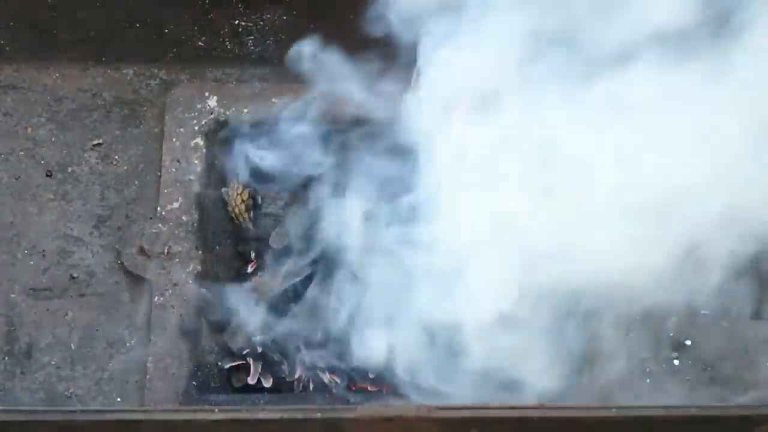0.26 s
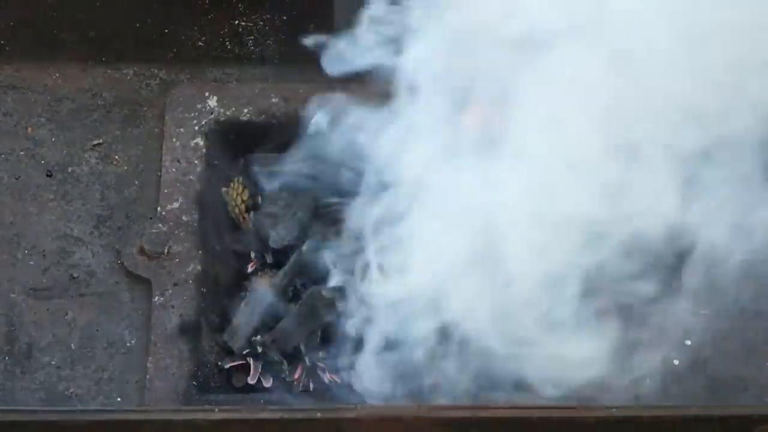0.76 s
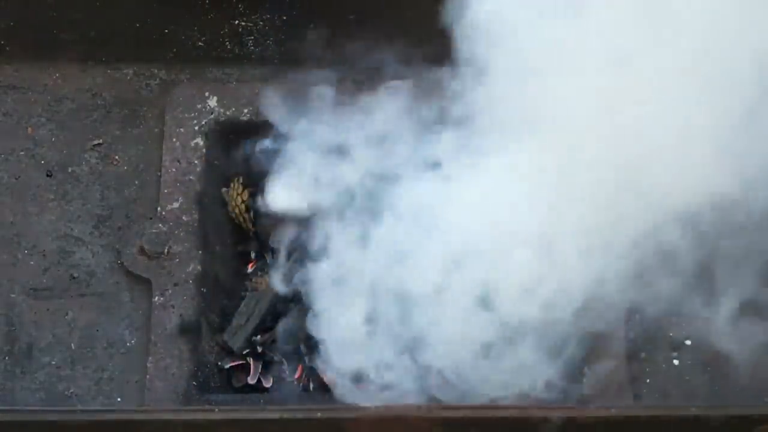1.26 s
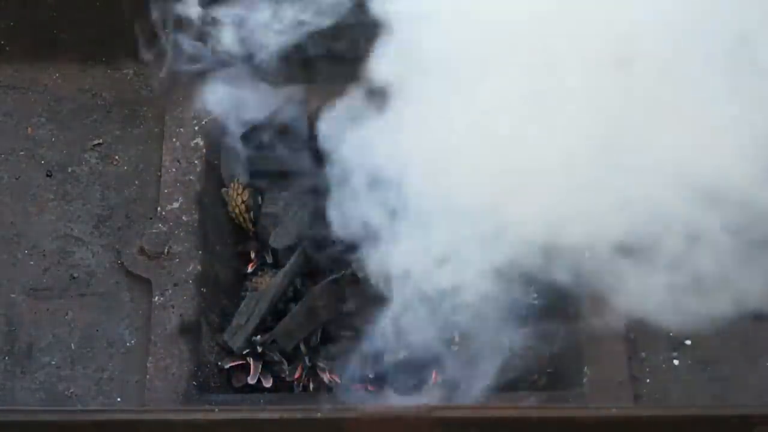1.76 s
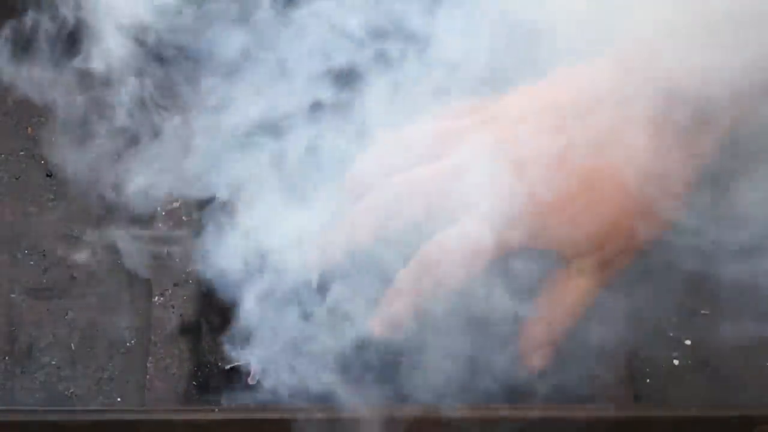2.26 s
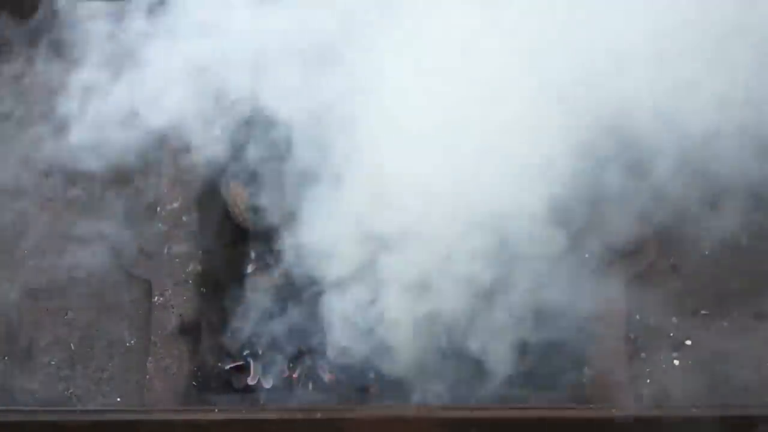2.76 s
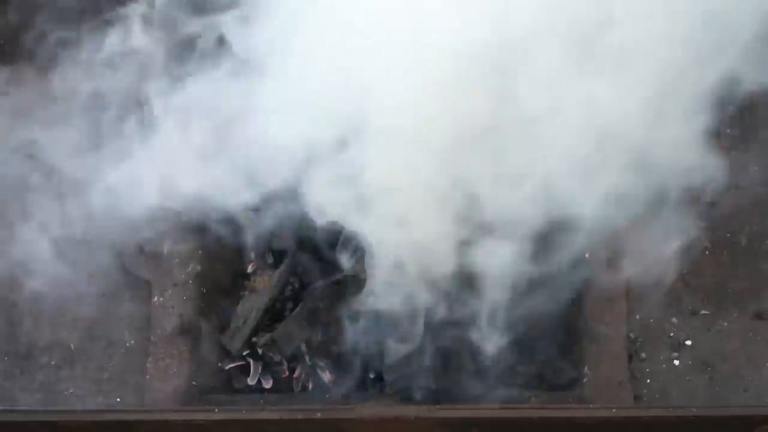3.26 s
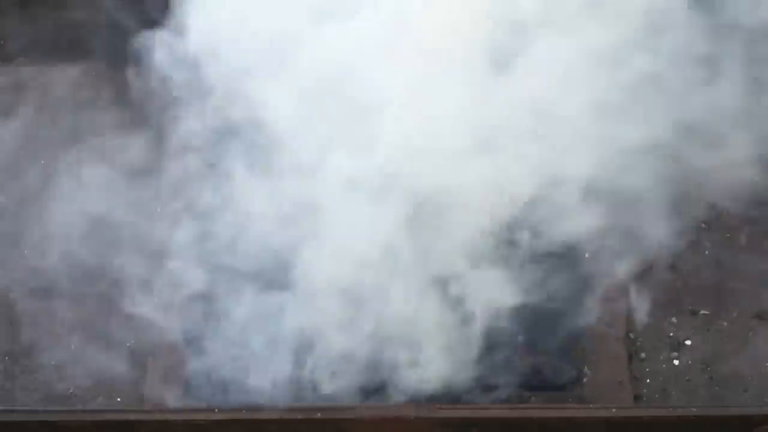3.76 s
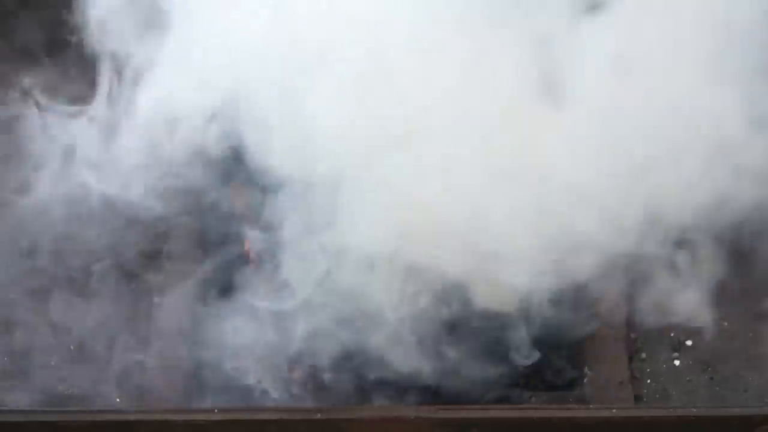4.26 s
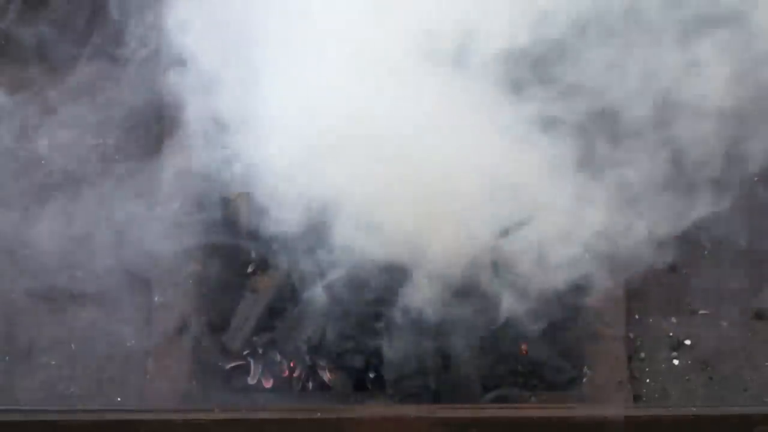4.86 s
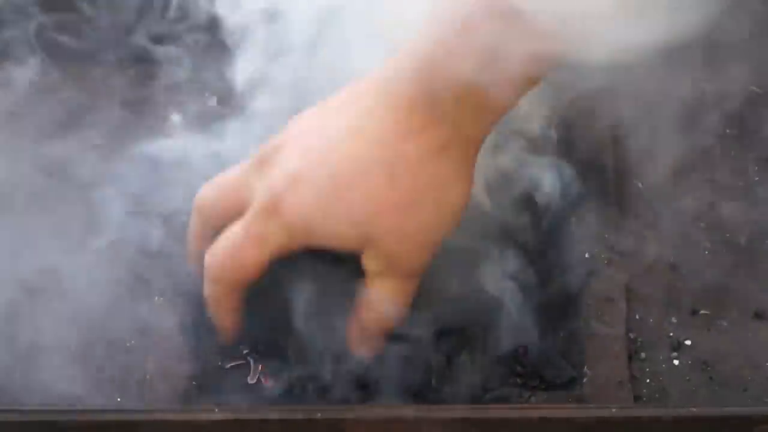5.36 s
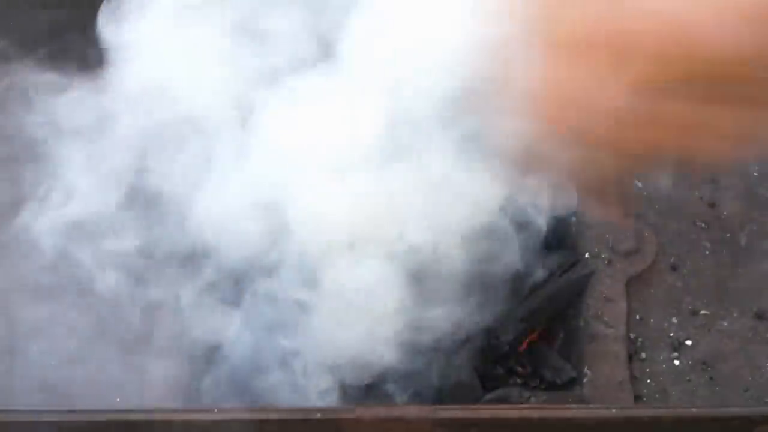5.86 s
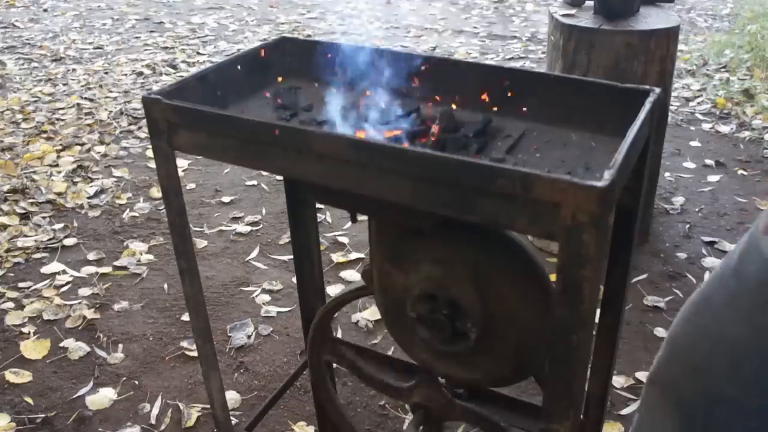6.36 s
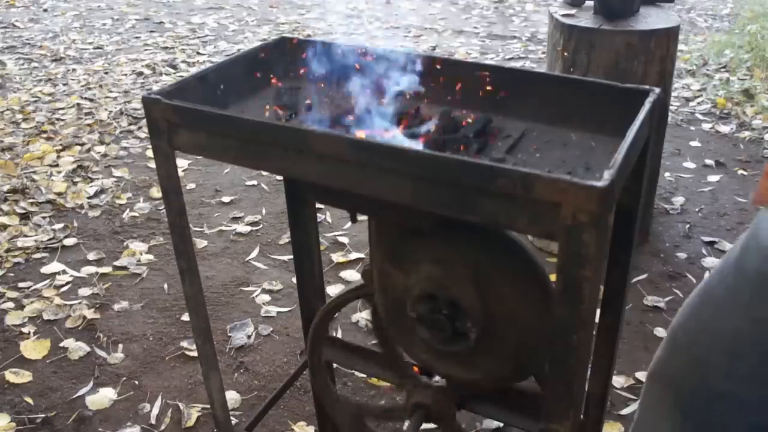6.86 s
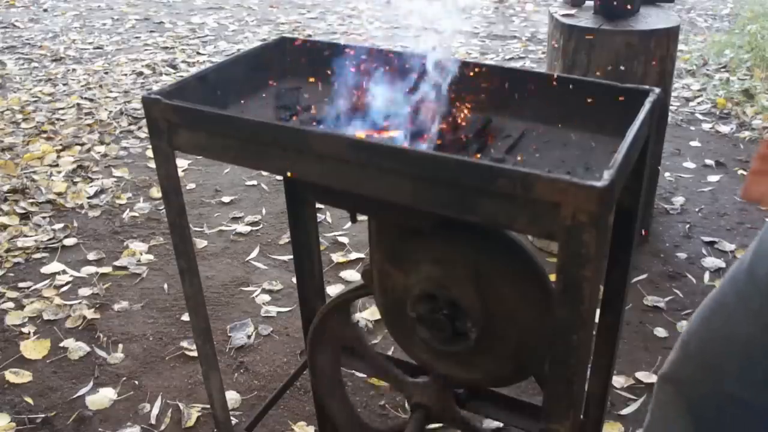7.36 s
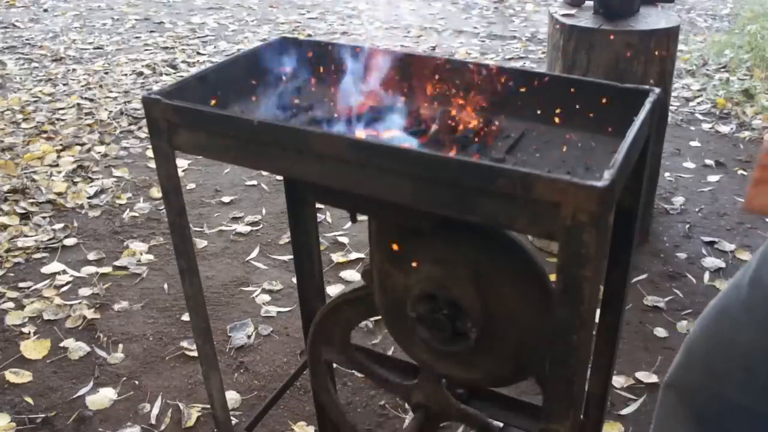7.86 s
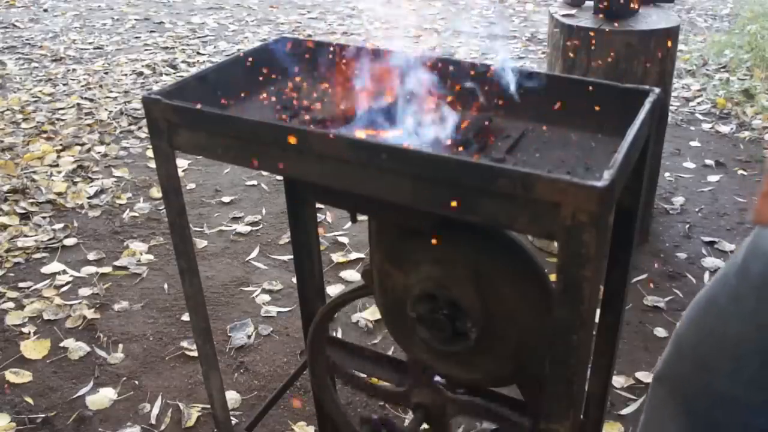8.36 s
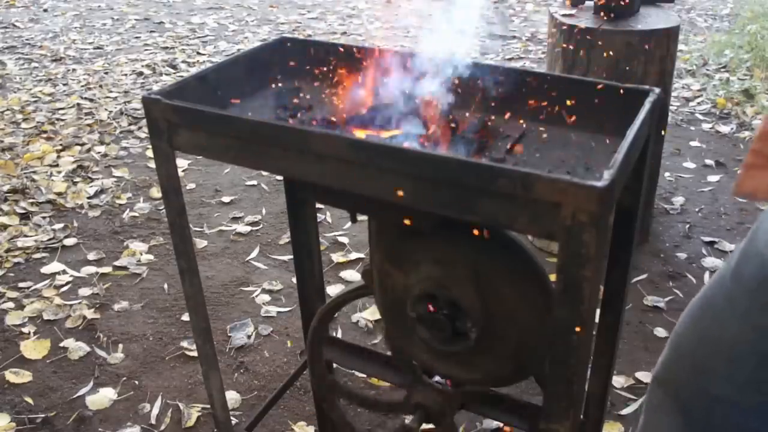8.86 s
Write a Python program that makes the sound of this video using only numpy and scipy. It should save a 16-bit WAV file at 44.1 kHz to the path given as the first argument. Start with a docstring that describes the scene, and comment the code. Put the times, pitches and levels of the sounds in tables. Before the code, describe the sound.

Dry scraping and clunking of coal, two small tinkling drops on iron, then an abrupt switch to rushing fan air, belt clacks and fierce crackling fire.

```python
"""Outdoor forge. First, coal is raked in a box to the right: grain noise for drag and slides, bursts for knocks.
Twice lumps drop on the hearth: cracks, tinkles, ringing pan and grate. Yard air and a passing low hum lie behind.
Abruptly at 6.07 s the forge is heard from a step back with its hand-cranked blower on: coloured noise roars
through casing resonances, the belt drive clacks now and then with ringing iron modes, and over a deep flame
flutter the coal fizzes, spits and snaps, building to about 8.45 s, then the fizz eases."""
import sys
import numpy as np
from scipy import signal
from scipy.fft import rfft, irfft, next_fast_len
from scipy.io import wavfile

SR = 44100
rng = np.random.default_rng(int(sys.argv[2]) if len(sys.argv) > 2 else 0)


def wav_record(signal):
    """Record a signal, one row per channel, as 16-bit PCM in the file named by sys.argv[1]."""
    frames = np.transpose(np.atleast_2d(signal))
    bounded = np.clip(frames, -1, 1)
    # unit amplitude maps onto the largest positive 16-bit level
    quanta = np.round(bounded * 32767).astype(np.int16)
    wavfile.write(sys.argv[1], SR, quanta)


N = 401310
T = np.arange(N) / SR   # s
BLOWER_ON_S = 6.066

# All levels are relative; the sources trim them.

# --- yard
# air spectrum: (frequency [Hz], gain [dB])
YARD_CURVE = [(18, -50), (30, -44), (55, -31), (81, -21), (157, -14.5), (273, -6), (336, -4), (404, -4),
              (449, -7), (584, -9.5), (702, -10.5), (988, -12), (1220, -14), (10800, -25.5), (16000, -51)]
YARD_DB = -46
# low hum that comes and goes: (time [s], length [s], level [dB])
HUM_EVENTS = [(0.93, .6, -62), (2.08, 0.084, -59), (3.68, 0.25, -61), (4.448, .25, -77)]
HUM_HZ, HUM_ATTACK_S, HUM_T60_S = 47.4, 0.06, 1.8
# faint hollow rustle: (time [s], length [s], level [dB])
RUSTLE_EVENTS = [(1.034, 0.2, -47), (1.46, 0.68, -53)]
# rustle spectrum: (frequency [Hz], gain [dB])
RUSTLE_CURVE = [(300, -43), (700, -17), (940, -3), (1200, -18), (4000, -28)]

# --- coal box
# lumps knocking: (time [s], knock [dB], box thud [dB], chipping [dB])
KNOCK_EVENTS = [(0.011, -10.5, -40, -51), (0.022, -18, -30.5, -50), (0.1438, -25, -19, -16),
                (0.196, -24, -22, -35), (0.217, -21, -10, -35), (0.245, -27, -24, -40),
                (0.3163, -9, -19, -27), (0.335, -24, -19, -40), (0.386, -24, -13.5, -17.5),
                (0.497, -26, -20.5, -40), (0.539, -16, -15, -26), (0.5543, -13, -12.5, -38),
                (0.588, -24, -25, -38), (0.643, -28, -21, -36), (0.772, -17, -20.5, -35),
                (0.693, -24, -17.5, -25), (0.717, -20, -19, -21), (0.8202, -33, -20, -41),
                (0.9056, -29, -13, -15), (0.9385, -25, -19, -35), (1.266, -9, -35, -22),
                (2.96, -10.5, -23, -28), (2.998, -19, -16.5, -30), (3.055, -8, -19, -31),
                (3.093, -18, -15.5, -30), (3.142, -16, -18, -22), (3.158, -12, -22, -17),
                (3.201, -24, -23, -30), (3.2292, -17, -21, -17), (3.318, -23, -23, -29),
                (3.3742, -2, -22, -18), (3.438, -5, -45, -40), (3.48, -12, -29, -35),
                (3.506, -14, -28, -35), (3.632, -21, -16, -18), (3.651, -10, -21, -21),
                (3.77, -28, -19, -31), (3.8599, -9.5, -18, -23), (3.9119, -16, -18.5, -15.5),
                (4.1054, -18, -20, -20.5), (4.2462, -2.5, -39, -17), (4.3155, -7.5, -33, -22),
                (4.323, -10, -43, -35), (4.332, -9, -44, -39), (4.343, -9, -44, -33), (4.35, -20, -44, -16),
                (4.3585, -20, -44, -35), (4.373, -9, -41, -34), (4.4035, -7, -47, -22),
                (4.42, -9.5, -44, -31), (4.428, -8.5, -38, -28), (4.441, -15, -44, -36),
                (4.4607, -11, -43, -24), (4.479, -10.5, -27.5, -32), (4.541, -15, -49, -37),
                (4.5782, -10.5, -49, -36), (4.5888, -15, -46, -40), (4.597, -19, -36, -42),
                (4.642, -18.5, -40, -38), (4.6555, -26, -50, -47)]
# strokes through the coal, each a steady drag: (time [s], length [s], level [dB])
STROKE_EVENTS = [(0.092, 1.2, -36), (2.99, 1.01, -33), (4.094, 0.35, -39.5)]
STROKE_ATTACK_S, STROKE_T60_S = 0.013, 0.56
DRAG_LUMPS_DB, DRAG_RUB_DB, DRAG_GRIT_DB = -1.5, -2.5, -3.5   # make-up of a drag
SETTLE_DB, SETTLE_T60_S = 0.5, 1.4   # grit trickling on after a stroke
# heap slides: (time [s], length [s], tumbling lumps [dB], rubbing faces [dB], grit [dB])
SLIDE_EVENTS = [(0.0, 0.13, -48, -39.5, -49), (0.112, 0.026, -27, -25.5, -24),
                (0.17, 0.018, -25.5, -21.5, -23), (0.212, 0.12, -25.5, -34.5, -31),
                (0.471, 0.11, -31.5, -35.5, -32.5), (0.657, 0.21, -30.5, -41, -32.5),
                (0.882, 0.042, -25.5, -40, -26), (1.156, 0.024, -53, -48, -25.5),
                (1.323, 0.031, -55, -60, -28.5), (1.418, .012, -65, -62, -41), (1.455, .006, -65, -62, -41),
                (2.953, 0.055, -27.5, -25, -29.5), (3.043, 0.14, -25.5, -29, -24.5),
                (3.299, 0.061, -26, -24, -23), (3.454, 0.04, -37, -23, -47),
                (3.581, 0.084, -30, -24, -26.5), (3.773, 0.094, -34, -34.5, -27.5),
                (3.9, .02, -32, -31, -32), (4.114, 0.078, -29.5, -29, -22), (4.237, 0.036, -36, -23, -22.5),
                (4.285, 0.18, -58, -30.5, -39), (4.34, 0.14, -70, -45, -40),
                (4.713, 0.019, -45, -43.5, -35.5), (4.796, 0.074, -71, -49.5, -45.5)]
SLIDE_ATTACK_S, SLIDE_T60_S = 0.02, 0.27
# soft bumps on the box wall: (time [s], level [dB])
BUMP_EVENTS = [(0.218, -19), (0.246, -15), (0.556, -23), (1.349, -23), (1.384, -30), (3.917, -18),
               (4.176, -20)]
# box wall modes: (frequency [Hz], level [dB], t60 [s])
WALL_RING_MODES = [(200, -20, 0.036), (276, -1.5, 0.063), (352, -10, 0.028)]
# band radiated by a soft contact on a small wall: (low edge [Hz], high edge [Hz])
WALL_BAND_HZ = (130, 550)
REBOUND_S, REBOUND_DB = 0.0054, -4.5   # second touch of a knocking lump
# dry double snap of a splitting lump: (time [s], level [dB])
SPLIT_EVENTS = [(1.2665, -3), (1.2718, -13)]
# spectra of box, rubbing faces, grit, knock, split: (frequency [Hz], gain [dB])
BOX_CURVE = [(40, -45), (80, -41), (130, -13.5), (200, -9), (280, 3), (450, -1.5), (700, 2.5), (1050, -4),
             (1500, -14), (2500, -26)]
RUB_CURVE = [(500, -47), (1000, -7.5), (1400, -7.5), (2000, -6.5), (2800, -11), (3800, -10), (6000, -27.5)]
GRIT_CURVE = [(1000, -28.5), (2500, -4.5), (4000, -0.5), (6000, 0), (8500, 0), (11000, -0.5), (13000, -3),
              (16000, -19.5)]
KNOCK_CURVE = [(300, -24), (900, -24), (1400, 0.5), (2100, 2), (2800, -5.5), (3600, -8), (5000, -16),
               (11000, -33), (16000, -36)]
SPLIT_CURVE = [(400, -30), (900, -10), (1400, 2), (2200, -1.5), (3400, -2), (4200, -12), (12000, -26)]
# resonances of box, rubbing faces, knock, split: (centre [Hz], width [Hz], gain [dB])
BOX_HUMPS = [(261.5, 58, 6.7), (369, 16, 3.2), (529, 15, 2), (682, 25, 2.6)]
RUB_HUMPS = [(1390, 130, 5.9), (2080, 270, 1.9)]
KNOCK_HUMPS = [(1840, 120, 2.3), (1980, 350, 5.9), (3200, 600, 4)]
SPLIT_HUMPS = [(1650, 280, 2), (3070, 350, 9)]
# delay of the left port, box sound: (frequency [Hz], delay [ms])
BOX_DELAY = [(300, 0.17), (1000, 0.14), (2600, 0.12), (4500, 0.09), (6500, 0.07), (10000, 0.07)]

# --- hearth
# lumps landing: (time [s], crack [dB], pan ring [dB], grate clink [dB],
#                 tinkle [dB], tinkle pitch [Hz], tinkle t60 [s])
DROP_EVENTS = [(2.158, -28, -70, -70, -33, 4880, 0.055), (2.171, -36, -60, -70, -29, 9300, .03),
               (2.1803, -9.5, -22, -29, -19, 5470, 0.047), (2.205, -35, -57, -70, -30, 10500, .05),
               (2.222, -31, -48, -70, -20, 10800, 0.023), (2.256, -26, -55, -70, -23, 9700, 0.056),
               (2.2814, -18.5, -55, -60, -20.5, 9480, 0.1), (2.285, -27, -55, -60, -26, 3900, 0.053),
               (2.288, -27, -55, -60, -29, 4500, .05), (2.296, -31, -36, -31, -40, 3060, .04),
               (2.307, -25, -28.5, -31, -39, 4320, .06), (2.313, -32, -40, -32, -34, 1700, .06),
               (2.319, -32, -33.5, -32, -33, 2020, 0.055), (2.328, -37, -35, -31.5, -33, 1430, .06),
               (2.344, -43, -51, -33, -42, 2350, .06), (2.361, -42, -60, -60, -29.5, 6040, 0.12),
               (2.3705, -36, -60, -60, -26, 6090, 0.047), (2.372, -27, -48, -43, -30, 4830, 0.024),
               (2.4965, -23.5, -55, -60, -32, 3700, .03), (5.345, -36, -70, -70, -35, 3950, 0.055),
               (5.359, -23, -56, -70, -28, 3700, .04), (5.376, -29, -58, -70, -30, 7560, .04),
               (5.38, -28, -60, -70, -33, 5900, .03), (5.3965, -32, -62, -70, -34, 4670, .03),
               (5.418, -35, -65, -70, -32, 4380, .03), (5.439, -39, -62, -65, -30, 5100, .07),
               (5.454, -33, -65, -70, -35, 9200, .05), (5.467, -32, -40, -38, -31, 3490, 0.085),
               (5.486, -31, -42, -46, -30, 10600, .08), (5.499, -40, -45, -41, -28, 1100, 0.048),
               (5.568, -40, -52, -52, -33, 4360, .06), (5.5835, -40, -65, -65, -33, 10300, .04),
               (5.590, -28, -58, -48, -32, 5400, .04), (5.636, -35, -44, -35.5, -42, 1660, 0.18)]
# iron pan and grate modes: (frequency [Hz], level [dB], t60 [s])
PAN_RING_MODES = [(582, -11.5, 0.34), (672, 0, 0.13), (784, -17, .08), (1000, -7.5, .07), (1426, -9, .13),
                  (1696, -10.5, 0.15), (1950, -12, 0.073), (2110, -8, 0.086), (2353, -19, .13),
                  (3100, -9, 0.11), (3580, -19, 0.09), (3962, -16, .09), (4285, -23, .2), (4576, -22, .15),
                  (4850, -11, 0.059), (5599, -8, .08)]
GRATE_RING_MODES = [(1127, -7, 0.25), (1196, -4.5, 0.31), (1294, -8.5, 0.22)]
# spills of coal: (time [s], length [s], crumbs [dB], scraping [dB])
SPILL_EVENTS = [(2.1, 0.084, -44, -56), (2.188, 0.025, -29.5, -34.5), (2.255, 0.018, -40, -52),
                (2.27, 0.025, -33, -42), (2.467, 0.016, -37.5, -48), (5.17, .09, -49, -71),
                (5.256, 0.054, -42.5, -60), (5.339, 0.033, -30, -47), (5.43, 0.053, -37, -43),
                (5.546, 0.035, -36, -44.5), (5.624, 0.029, -60, -60)]
SPILL_ATTACK_S, SPILL_T60_S = 0.0094, 0.58
# crack and scrape spectra: (frequency [Hz], gain [dB])
CRACK_CURVE = [(100, -53), (400, -23), (620, 0.5), (1500, -0.5), (4000, 3), (7000, -6), (11000, -4),
               (16000, -40)]
SCRAPE_CURVE = [(200, -42), (500, -6), (1000, 0.5), (2000, -1.5), (2800, -6.5), (4000, -2), (6000, -13),
                (12000, -10.5)]
# hollow of the hearth, scrape resonances: (centre [Hz], width [Hz], gain [dB])
HEARTH_HUMPS = [(584, 120, 8), (1130, 160, -0.5), (1660, 240, 3)]
SCRAPE_HUMPS = [(3900, 200, 3), (4450, 250, 2), (5330, 250, 9)]
HEARTH_LOW_HZ = 450   # pan radiates little below this
# delay of the left port, hearth sound: (frequency [Hz], delay [ms])
HEARTH_DELAY = [(1000, .01), (2600, 0.053), (6000, 0.014)]

# --- blower
# fan roar, surging with the crank: (time [s], level [dB])
FAN_SURGE = [(6.07, -28), (6.22, -27.5), (6.38, -26.5), (6.43, -25), (6.49, -24.5), (6.62, -27),
             (6.68, -23), (6.8, -24), (7.05, -24), (7.16, -24), (7.42, -24), (7.53, -23), (7.62, -26),
             (7.71, -26), (7.79, -22), (7.87, -25), (7.96, -21.5), (8.07, -28.5), (8.13, -24), (8.18, -26),
             (8.25, -21.5), (8.31, -23.5), (8.36, -21.5), (8.43, -23.5), (8.49, -21.5), (8.56, -24),
             (8.62, -21.5), (8.69, -25.5), (8.75, -19.5), (8.82, -24), (8.92, -21.5), (9.0, -24),
             (9.1, -25)]
# fan spectrum: (frequency [Hz], gain [dB])
FAN_CURVE = [(30, -52), (60, -43), (100, -22), (160, -12), (240, -4), (310, -5.5), (365, -8.5), (430, 0),
             (720, 0), (840, -11.5), (1100, -11), (1800, -16.5), (2500, -18.5), (4200, -32.5), (12000, -59)]
# casing resonances: (centre [Hz], width [Hz], gain [dB])
CASING_HUMPS = [(239, 51, 4), (290, 50, 5.5), (510.7, 20, 6), (580, 35, -2), (621, 14, 3.5), (850, 40, -6),
                (923, 20, 5), (1011, 19, 7), (1095, 56, 9), (1217, 29, 10), (1400, 30, 2), (1521, 93, 9),
                (1621, 48, 8), (1740, 90, -1), (1972, 42, 6), (2120, 60, 4.5), (2444, 78, 5),
                (2730, 60, 3.5)]
PULLEY_HZ, THROB_DB, FLUTTER_DB = 5.8, 0.5, 1.0   # throb once a turn, random flutter
# band edges of the eddy sizes: [Hz]
EDDY_BAND_EDGES_HZ = (360, 580, 850)
EDDY_DB, EDDIES_PER_S = 1.7, 20
# clacks of the drive: (time [s], level [dB])
CLACK_EVENTS = [(6.487, -17), (6.717, -15.5), (6.7201, -17), (6.935, -26), (7.094, -14.5), (7.404, -20),
                (8.32, -15), (8.617, -14.5), (8.629, -23.5)]
# clack spectrum: (frequency [Hz], gain [dB])
CLACK_CURVE = [(600, -24), (1300, 0.5), (2050, -1), (2900, -1), (3900, 3.5), (5200, -7), (9000, -10),
               (16000, -23)]
# clack resonances: (centre [Hz], width [Hz], gain [dB])
CLACK_HUMPS = [(1230, 130, 8), (1620, 55, 4), (1830, 110, -2), (2020, 160, 4.5), (2310, 80, 4),
               (2460, 220, 7.5), (3650, 100, 1), (3830, 150, -1), (4130, 190, 6)]
# iron of the drive: (frequency [Hz], level [dB], t60 [s])
DRIVE_RING_MODES = [(1230, -6.5, 0.069), (1645, -1.5, .2), (1987, -2.5, .2), (2104, 2.5, 0.092),
                    (2432, 2.5, 0.09), (2625, -5, 0.079), (3380, -16, 0.11), (3820, -4, .12),
                    (4040, -7, .12), (4120, -4, 0.11)]
DRIVE_RING_DB = -11.5   # re the clack level in its table

# --- fire
# ticks of smouldering coal: (time [s], level [dB], pitch [Hz])
EMBER_EVENTS = [(4.901, -38, 8000), (5.092, -36.5, 6940), (5.262, -37, 7000), (5.686, -55, 6400),
                (5.775, -39.5, 6500), (5.820, -27, 7000)]
# loudest bursts: (time [s], snap [dB], pitch [Hz], dull puff [dB])
POP_EVENTS = [(6.1223, -18, 7200, -51), (6.368, -25, 8000, -45), (6.4252, -14.5, 7050, -31),
              (6.683, -24.5, 7400, -35), (6.814, -25, 7300, -40), (6.938, -22.5, 6900, -26),
              (7.021, -26.5, 8100, -39), (7.1652, -16.5, 8050, -35), (7.2494, -17.5, 5700, -24),
              (7.2993, -25.5, 7500, -34), (7.306, -23, 8200, -39), (7.3161, -26, 7900, -41),
              (7.3194, -24.5, 7400, -41), (7.324, -17.5, 7300, -43), (7.5687, -14.5, 8200, -36),
              (7.6179, -30, 7700, -43), (7.6227, -9, 6460, -18), (7.6497, -12, 7000, -35),
              (7.6858, -26, 7500, -40), (7.7215, -14, 7200, -22.5), (7.7577, -28, 6100, -40),
              (7.7737, -20, 5700, -24), (7.7888, -26, 7600, -29), (7.8327, -23.5, 6400, -29),
              (7.838, -18.5, 5500, -27), (7.865, -13.5, 7800, -28), (7.8848, -27, 7400, -27),
              (7.8963, -33, 7500, -36), (7.9133, -22, 6400, -20.5), (7.948, -20, 7300, -31),
              (8.0325, -27.5, 8300, -41), (8.0543, -11.5, 8300, -28), (8.07, -18, 7700, -38),
              (8.0756, -17, 7700, -36), (8.0895, -23, 7500, -39), (8.104, -25.0, 7600, -37),
              (8.1143, -24, 8000, -37), (8.172, -14.0, 6860, -22), (8.1825, -24, 7200, -41),
              (8.221, -19, 5170, -22), (8.2278, -24.5, 7300, -30), (8.2847, -24.0, 7200, -38),
              (8.291, -26, 7400, -38), (8.299, -34, 7400, -26), (8.321, -28, 3700, -21),
              (8.326, -14.5, 6500, -31), (8.348, -23, 5200, -23), (8.39, -26, 7300, -32),
              (8.4001, -22.5, 7700, -37), (8.4054, -20, 8400, -38), (8.414, -22.0, 8100, -25),
              (8.4565, -22.5, 7600, -40), (8.4749, -24, 8500, -35), (8.4936, -25.5, 7400, -32),
              (8.504, -20.0, 6150, -22), (8.509, -19.5, 8700, -41), (8.5581, -23, 8700, -42),
              (8.5627, -29, 7900, -40), (8.6297, -27, 4200, -24), (8.6416, -19.0, 7000, -31),
              (8.6493, -24, 8600, -36), (8.6801, -21.5, 6130, -28), (8.7434, -18.5, 5100, -20),
              (8.7768, -15.5, 6700, -20.5), (8.8177, -25, 5600, -25.5), (8.8704, -16.5, 6350, -23),
              (8.9358, -24.5, 8200, -40), (8.9486, -24, 6300, -35), (8.956, -25, 7600, -31),
              (8.988, -25.5, 8300, -42), (9.0257, -19.5, 8500, -39), (9.084, -10, 6100, -19)]
# briskness of the burn: (time [s], level [dB])
BURN_LEVEL = [(6.07, -42), (6.4, -40.5), (7.1, -41), (7.55, -39.5), (7.9, -38), (8.45, -35.5), (8.6, -41),
              (9.1, -41)]
BURN_REF_DB = -36.5
SPITS_PER_S, SPIT_DB, SPIT_SPREAD_DB = 36, -30.5, 1   # lesser bursts at the reference burn
SPIT_FOLLOWS = 0.43   # share of the burn's dB swing in spit level
SHOWER_DB, SHOWER_T60_S = -19.5, 0.33   # sparks after a loud burst, re its level in the table
FIZZ_DB, FIZZ_FLICKER_DB = -2, 1.5   # re burn
# snap, puff and flame spectra: (frequency [Hz], gain [dB])
SNAP_CURVE = [(300, -28), (800, -4), (1500, -3.5), (2700, 1.5), (3600, -2), (8000, -1), (16000, 3.5)]
PUFF_CURVE = [(300, -22), (650, 0), (1100, -1), (2200, -0.5), (3200, -3.5), (8000, -34)]
FLAME_CURVE = [(25, -20), (45, 1), (80, -3), (130, 5), (300, -15), (1000, -50)]
FLAME_DB = -24   # re burn

# treble falls away steeply above 12 kHz: (frequency [Hz], gain [dB])
TREBLE_CURVE = [(20, -2), (11000, 0), (12200, -4), (13400, -21), (14600, -16), (16000, -23)]
CUTOFF_HZ = 17000   # stopband edge


def from_db(db):
    """dB to amplitude."""
    return 10 ** (np.asarray(db) / 20)


def rms_one(x):
    """Scales to rms 1."""
    return x / np.sqrt(np.mean(x ** 2) + 1e-20)


def level_at(t_s, points):
    """Interpolates a (time, level) table."""
    return np.interp(t_s, *np.transpose(points))


def drift(rate_hz):
    """Random straight-line wander between unit-spread knots, rate_hz knots a second."""
    knots = rng.standard_normal(4000)
    return np.interp(T * rate_hz, np.arange(4000), knots)


def colour(x, points, resonances=()):
    """Minimum-phase filter: dB curve over log frequency plus resonant humps."""
    size = next_fast_len(N + 8192) // 2 * 2
    hz = np.fft.rfftfreq(size, 1 / SR) + 1
    curve_hz, curve_db = np.transpose(points)
    db = np.interp(np.log(hz), np.log(curve_hz), curve_db)
    for centre_hz, width_hz, hump_db in resonances:
        db = db + hump_db / (1 + (2 * (hz - centre_hz) / width_hz) ** 2)
    # causal half of the cepstrum gives the minimum phase
    cepstrum = irfft(np.log(from_db(db)))[:size // 2]
    cepstrum[0] /= 2
    response = np.exp(2 * rfft(cepstrum, size))
    return irfft(rfft(x, size) * response, size)[..., :N]


def filtered(x, kind, edges_hz):
    """Second-order Butterworth filter."""
    return signal.sosfilt(signal.butter(2, edges_hz, kind, fs=SR, output="sos"), x)


def hiss():
    """White noise."""
    return rng.standard_normal(N)


def grains(per_s, spread_db):
    """Random tiny fractures of very unequal size; rms 1."""
    sizes = from_db(spread_db * np.minimum(rng.exponential(1, N), 4.5))
    signs = rng.choice([-1, 1], N)
    return rms_one(sizes * signs * (rng.random(N) < per_s / SR))


def stereo(source, alike):
    """Mixes a part shared by both ports with an independent part for each, by power."""
    return np.sqrt(alike) * source() + np.sqrt(1 - alike) * np.array([source(), source()])


def from_right(pair, delay=BOX_DELAY):
    """Sound from the right: left port late and shaded, right port louder."""
    size = next_fast_len(N + 64) // 2 * 2
    hz = np.fft.rfftfreq(size, 1 / SR)
    delay_s = np.interp(hz, *np.transpose(delay)) / 1000
    late = irfft(rfft(pair[0], size) * np.exp(-2j * np.pi * hz * delay_s), size)[:N]
    shaded = colour(late, [(100, 0.4), (2300, 0.75), (3500, -1.5), (5500, 0.4), (8000, 1.0), (12000, 0.5)])
    return np.array([shaded, pair[1] * from_db(2.5)])


def burst(t60_s, alike, size=16384):
    """Stereo noise that starts at rms 1 and dies away."""
    shared, *own = rng.standard_normal((3, size))
    noise = np.sqrt(alike) * shared + np.sqrt(1 - alike) * np.array(own)
    return noise * from_db(-60 * np.arange(size) / SR / t60_s)


def add(out, time_s, sound):
    """Mixes in a sound at time_s."""
    at = int(np.clip(round(time_s * SR), 0, N - 1))
    out[:, at:at + sound.shape[1]] += sound[:, :N - at]


def swells(starts_s, lengths_s, levels_db, attack_s, t60_s):
    """Gain of events that rise, hold and die away; overlaps add in power."""
    power = np.zeros(N)
    for start_s, length_s, db in zip(starts_s, lengths_s, levels_db):
        span = slice(*np.searchsorted(T, [start_s, start_s + length_s + t60_s]))
        age_s = T[span] - start_s
        rise = np.minimum(age_s / attack_s, 1)
        fall_db = -60 * np.maximum(age_s - length_s, 0) / t60_s
        power[span] += (rise * from_db(db + fall_db)) ** 2
    return np.sqrt(power)


def blows(times_s, levels_db, t60_s, tail_db, tail_t60_s, alike, rough_db=0, vary_db=0, tail_alike=0.29):
    """Short uneven crunches, each of its own colour, with scatter from the surroundings."""
    out = np.zeros((2, N))
    for time_s, db in zip(times_s, levels_db):
        sound = burst(t60_s, alike) + from_db(tail_db) * burst(tail_t60_s, tail_alike)
        chatter = np.interp(T[:sound.shape[1]], np.arange(256) * 0.002, rng.standard_normal(256))
        sound = sound * rms_one(from_db(rough_db * chatter))
        for peak_hz in rng.uniform([1000, 2200], [2200, 5000]):
            peak = signal.lfilter(*signal.iirpeak(peak_hz, 7, fs=SR), sound)
            sound = sound + (from_db(vary_db) - 1) * peak
        add(out, time_s, from_db(db) * sound)
    return out


def resonate(clicks, hz, t60_s):
    """A unit click sets a decaying cosine of height 1 ringing."""
    r, w = from_db(-60 / (t60_s * SR)), 2 * np.pi * hz / SR
    return signal.lfilter([1, -r * np.cos(w)], [1, -2 * r * np.cos(w), r * r], clicks + 1e-18)


def ring(times_s, levels_db, modes, vary_db=1.0, contact_s=0.00037):
    """Each blow excites every mode at its own strength, at a random moment of the contact."""
    out = np.zeros(N)
    for hz, mode_db, t60_s in modes:
        clicks = np.zeros(N)
        at_s = times_s + contact_s * rng.random(len(times_s))
        strength_db = levels_db + mode_db + vary_db * rng.standard_normal(len(times_s))
        clicks[(at_s * SR).astype(int)] = from_db(strength_db)
        out += resonate(clicks, hz, t60_s)
    return out


def chinks(per_s, t60_s, count=36):
    """Brittle splinters ring briefly at one of count pitches; rms 1."""
    clicks = grains(per_s, spread_db=5.5)
    dealt = rng.integers(0, count, N)
    pitches_hz = np.linspace(3000, 12000, count) + rng.uniform(-120, 120, count)
    return rms_one(sum(resonate(clicks * (dealt == k), hz, t60_s) for k, hz in enumerate(pitches_hz)))


def tinkles(rows, overtone, overtone_db, rough_db, chatter_s):
    """Each lump rings at its own pitch and decay, plus a quicker overtone; level chatters at random."""
    out, t = np.zeros((2, N)), np.arange(16384) / SR
    for time_s, db, hz, t60_s in rows:
        decay_db = -60 * t / t60_s
        tone = np.sin(2 * np.pi * hz * t)
        tone = tone + from_db(overtone_db + decay_db) * np.sin(2 * np.pi * hz * overtone * t)
        chatter = np.interp(t / chatter_s, np.arange(256), rng.standard_normal(256))
        add(out, time_s, from_db(db + decay_db + rough_db * chatter) * tone[None])
    return out


def pops(rows, t60_s, width, scatter_db, scatter_t60_s, echo_s, echo_db):
    """Gas pockets burst in brief pitched snaps; the pan floor echoes each and scatters a faint tail."""
    out = np.zeros((2, N))
    for time_s, db, hz in rows:
        reach = 1 + width * from_db(0.072 * (db + 30.0))   # louder bursts are wider in band
        edges_hz = np.clip([hz / reach, hz * reach], 300, 0.45 * SR)
        lags = rng.integers(0, 3, size=2)   # samples; own spot in the fire
        snap = np.array([np.roll(port, lag) for port, lag in zip(burst(t60_s, 0.76, size=4096), lags)])
        add(snap, echo_s * rng.uniform(0.26, 1.5), from_db(echo_db) * burst(t60_s, 0.27, size=2048))
        snap = snap + from_db(scatter_db) * burst(scatter_t60_s, 0.033, size=4096)
        snap = signal.lfilter(*signal.butter(1, edges_hz, "band", fs=SR), snap)
        onset_rms = np.sqrt(np.mean(snap[:, :132] ** 2))   # first 3 ms
        add(out, time_s, from_db(db) * snap / onset_rms)
    return colour(out, SNAP_CURVE)


def yard():
    """Open air with the soft hiss of smouldering coal as dense grains, and a wavering low hum."""
    air = rms_one(colour(stereo(lambda: grains(per_s=24000, spread_db=2.5), alike=0.28), YARD_CURVE))
    hum_hz = HUM_HZ + 2.4 * drift(rate_hz=12)
    hum = rms_one(np.sin(2 * np.pi * np.cumsum(hum_hz) / SR))
    hum = hum * swells(*np.transpose(HUM_EVENTS), HUM_ATTACK_S, HUM_T60_S)
    return from_right(from_db(YARD_DB) * air + hum)


def rustle():
    """Faint hollow rustle late in the first stroke and after it: band-shaped noise."""
    noise = rms_one(colour(stereo(hiss, alike=0.52), RUSTLE_CURVE))
    return from_right(noise * swells(*np.transpose(RUSTLE_EVENTS), attack_s=0.071, t60_s=0.4))


def embers():
    """Smouldering coal ticks as small, dry bursts."""
    return pops(EMBER_EVENTS, t60_s=0.004, width=0.89, scatter_db=-37, scatter_t60_s=0.05,
                echo_s=0.0012, echo_db=-19)


def flames():
    """Deep noise flutter that follows the burn."""
    flutter = rms_one(colour(stereo(hiss, alike=0.6), FLAME_CURVE))
    return flutter * from_db(level_at(T, BURN_LEVEL) + FLAME_DB + 2.0 * drift(rate_hz=14))


def bumps():
    """Soft pushes set the box wall booming briefly in its modes."""
    return filtered(ring(*np.transpose(BUMP_EVENTS), WALL_RING_MODES), "band", WALL_BAND_HZ)


def splits():
    """A lump breaks under the rake: two dry noise snaps."""
    snaps = blows(*np.transpose(SPLIT_EVENTS), t60_s=0.013, tail_db=-19, tail_t60_s=0.12, alike=0.9)
    return colour(snaps, SPLIT_CURVE, SPLIT_HUMPS)


def raking():
    """Strokes and slides: lumps tumble, rub and shed grit in small shared surges."""
    starts_s, lengths_s, *slide_db = np.transpose(SLIDE_EVENTS)
    tumbling, rubbing, shedding = (
        swells(starts_s, lengths_s, db, SLIDE_ATTACK_S, SLIDE_T60_S) for db in slide_db)
    drag = swells(*np.transpose(STROKE_EVENTS), STROKE_ATTACK_S, STROKE_T60_S)
    settling = from_db(SETTLE_DB) * swells(*np.transpose(STROKE_EVENTS), STROKE_ATTACK_S, SETTLE_T60_S)
    surge = rms_one(from_db(1.6 * drift(rate_hz=150)))

    lumps = colour(stereo(lambda: grains(per_s=1100, spread_db=2.6), alike=0.97), BOX_CURVE, BOX_HUMPS)
    rub = colour(stereo(lambda: grains(per_s=5000, spread_db=4.0), alike=0.66), RUB_CURVE, RUB_HUMPS)
    splinters = from_db(-8.0) * chinks(per_s=700, t60_s=0.037)
    grit = colour(stereo(lambda: grains(per_s=16000, spread_db=3.5), alike=0.55) + splinters, GRIT_CURVE)

    lumps_gain = np.hypot(tumbling, from_db(DRAG_LUMPS_DB) * drag)
    rub_gain = np.hypot(rubbing, from_db(DRAG_RUB_DB) * drag)
    grit_gain = np.hypot(shedding, np.hypot(from_db(DRAG_GRIT_DB) * drag, settling))
    return surge * (rms_one(lumps) * lumps_gain + rms_one(rub) * rub_gain + rms_one(grit) * grit_gain)


def coal_box():
    """Raked coal; lumps knock and rebound, thud on the box and chip."""
    s, knock_db, thud_db, chip_db = np.transpose(KNOCK_EVENTS)
    chips = blows(s, chip_db + 0.5, t60_s=0.077, tail_db=-18, tail_t60_s=0.11, alike=0.57)
    touches_s = np.r_[s, s + REBOUND_S]
    touches_db = np.r_[knock_db, knock_db + REBOUND_DB] - 3.5
    touches = blows(touches_s, touches_db, t60_s=0.014, tail_db=-13.5, tail_t60_s=0.15, alike=0.95, vary_db=4)
    thuds = blows(s, thud_db + 8.5, t60_s=0.036, tail_db=-7.0, tail_t60_s=0.16, alike=0.95, tail_alike=0.93)
    knocking = (colour(touches, KNOCK_CURVE, KNOCK_HUMPS) + colour(thuds, BOX_CURVE, BOX_HUMPS)
                + colour(chips, GRIT_CURVE))
    return from_right(raking() + knocking + bumps() + splits())


def hearth():
    """Dropped lumps crack, tinkle, scrape and ring the iron pan and grate; crumbs trickle."""
    s, crack_db, pan_db, grate_db, *tinkle = np.transpose(DROP_EVENTS)
    cracks = blows(s, crack_db, t60_s=0.013, tail_db=-9, tail_t60_s=0.13, alike=1.0, rough_db=1.5)
    cracks = colour(cracks, CRACK_CURVE, HEARTH_HUMPS)
    pan = ring(s, pan_db, PAN_RING_MODES, vary_db=3.5, contact_s=0.0031)
    grate = ring(s, grate_db, GRATE_RING_MODES, vary_db=0.5, contact_s=0.00306)
    tinkling = tinkles(zip(s, *tinkle), overtone=1.37, overtone_db=-11, rough_db=2.5, chatter_s=0.003)

    starts_s, lengths_s, *spill_db = np.transpose(SPILL_EVENTS)
    trickling, scraping = (swells(starts_s, lengths_s, db, SPILL_ATTACK_S, SPILL_T60_S) for db in spill_db)
    crumbs = stereo(lambda: grains(per_s=9000, spread_db=7.5), alike=0.18)
    crumbs = crumbs + from_db(-5.5) * chinks(per_s=2200, t60_s=0.025)
    crumbs = from_db(-2.5) * rms_one(colour(crumbs, GRIT_CURVE)) * trickling
    scrape = stereo(lambda: grains(per_s=8000, spread_db=3.5), alike=0.44)
    scrape = rms_one(colour(scrape, SCRAPE_CURVE, [*HEARTH_HUMPS, *SCRAPE_HUMPS])) * scraping

    radiated = filtered(cracks + pan + grate + tinkling + crumbs + scrape, "high", HEARTH_LOW_HZ)
    return from_right(radiated, HEARTH_DELAY)


def eddies(x):
    """Splits a roar into bands; all but the top one waver independently; rms 1."""
    out = 0
    for edge_hz in EDDY_BAND_EDGES_HZ:
        band = signal.sosfiltfilt(signal.butter(2, edge_hz, fs=SR, output="sos"), x)
        out = out + band * from_db(EDDY_DB * drift(rate_hz=EDDIES_PER_S))
        x = x - band
    return rms_one(out + x)


def fan():
    """Turbulence rings the casing, surges with the crank and throbs with the pulley."""
    throb_db = THROB_DB * np.sin(2 * np.pi * PULLEY_HZ * T) + FLUTTER_DB * drift(rate_hz=22)
    # rumble and treble arrive from all around, the middle straight from the casing
    scattered = colour(stereo(hiss, alike=0), [(40, 15), (130, -20.0), (500, -15.5), (850, -8.5), (1600, -8),
                                               (2600, -5.5), (3300, 5.5), (12000, 16)])
    roar = eddies(colour(hiss() + scattered, FAN_CURVE, CASING_HUMPS))
    return roar * from_db(level_at(T, FAN_SURGE) + throb_db - 0.5)


def belt_drive():
    """Clacks: noise bursts with the drive's iron modes ringing."""
    s, db = np.transpose(CLACK_EVENTS)
    clacks = blows(s, db + 0.5, t60_s=0.12, tail_db=-11.5, tail_t60_s=0.3, alike=0.41, rough_db=2.0, vary_db=4)
    iron = ring(s, db + DRIVE_RING_DB, DRIVE_RING_MODES, vary_db=2.0, contact_s=0.003)
    return colour(clacks, CLACK_CURVE, CLACK_HUMPS) + iron


def blower():
    """Fan and belt drive, both slightly right of centre."""
    return fan() * from_db([[-0.8], [0.8]]) + belt_drive() * from_db([[-1.5], [1.5]])


def spits(count=240):
    """Random lesser bursts, more and louder with a brisker burn: rows (time [s], level [dB], pitch [Hz])."""
    when, chance, pitch = rng.random((count, 3)).T
    blown_s = T[-1] - BLOWER_ON_S
    s = BLOWER_ON_S + (np.arange(count) + when) / count * blown_s
    brisk_db = level_at(s, BURN_LEVEL) - BURN_REF_DB
    per_s = SPITS_PER_S * from_db(brisk_db)
    spread_db = SPIT_SPREAD_DB * np.clip(rng.standard_normal(count), -2, 2)
    db = SPIT_DB + SPIT_FOLLOWS * brisk_db + spread_db
    kept = chance < per_s * blown_s / count
    return np.transpose([s, db, 5800 + 2800 * pitch])[kept]


def fire():
    """Blown coal fizzes and spits; each loud pop throws a hissing shower of sparks."""
    fizz = stereo(lambda: grains(per_s=4000, spread_db=5.0), alike=0.2)
    sparks = grains(per_s=150, spread_db=3.0)
    sparks = signal.fftconvolve(sparks[None], burst(t60_s=0.003, alike=0.6), axes=1)[:, :N]
    burning = from_db(level_at(T, BURN_LEVEL) + FIZZ_DB + FIZZ_FLICKER_DB * drift(rate_hz=25))
    bed = rms_one(colour(fizz + from_db(4.5) * rms_one(sparks), GRIT_CURVE)) * burning

    s, pop_db, pop_hz, puff_db = np.transpose(POP_EVENTS)
    shower_gain = swells(s, np.zeros(len(s)), pop_db + SHOWER_DB, attack_s=0.0028, t60_s=SHOWER_T60_S)
    showers = rms_one(colour(fizz, GRIT_CURVE)) * shower_gain
    puffs = blows(s, puff_db + 17.5, t60_s=0.008, tail_db=-20, tail_t60_s=0.05, alike=0.85)
    snaps = pops([*zip(s, pop_db, pop_hz), *spits()], t60_s=0.0082, width=0.54, scatter_db=-15.0,
                 scatter_t60_s=0.043, echo_s=0.00069, echo_db=-9.5)
    mix = bed + showers + from_db(3.5) * snaps + colour(puffs, PUFF_CURVE)
    return mix * from_db([[-0.4], [0.4]])


def scene():
    """Feeding the forge, then blowing it, with a 5 ms crossfade."""
    blowing = np.clip((T - BLOWER_ON_S) / 0.005, 0, 1)
    feeding_mix = yard() + rustle() + embers() + hearth() + coal_box()
    blowing_mix = flames() + blower() + fire()
    return (1 - blowing) * feeding_mix + blowing * blowing_mix


def record(dry):
    """The treble falls away steeply above 12 kHz, peaks clip at full scale, a steep low-pass cuts the top."""
    heard = np.clip(colour(dry, TREBLE_CURVE), -1, 1)
    return signal.sosfilt(signal.cheby2(14, 70, CUTOFF_HZ, fs=SR, output="sos"), heard)


dry = scene()
out = record(dry)
wav_record(out)
```